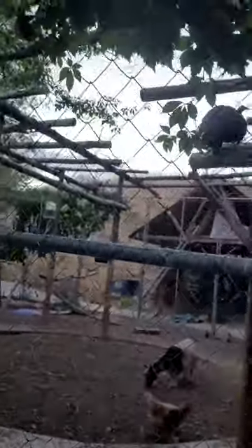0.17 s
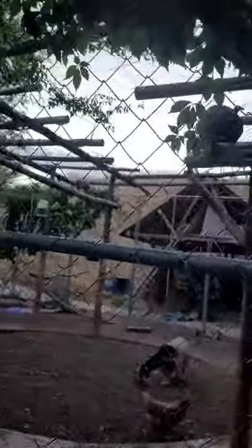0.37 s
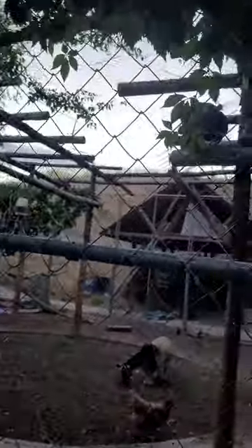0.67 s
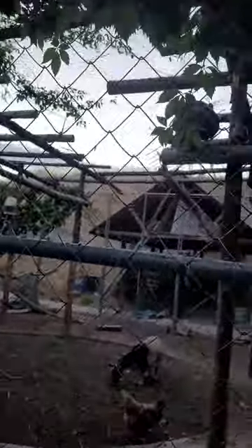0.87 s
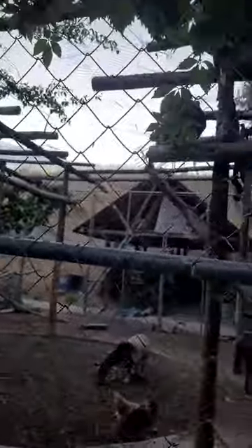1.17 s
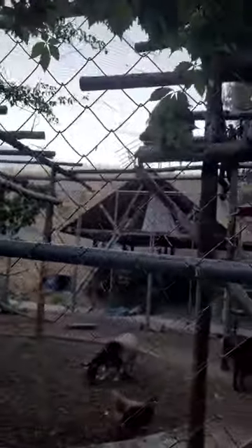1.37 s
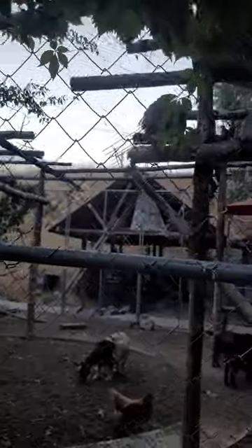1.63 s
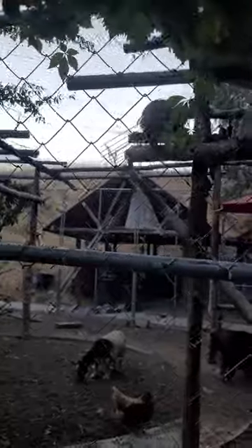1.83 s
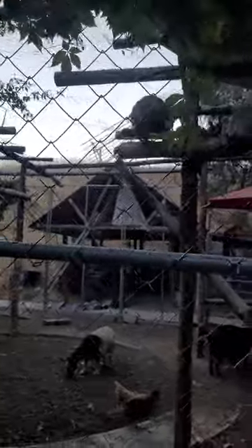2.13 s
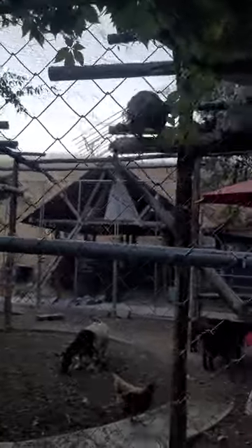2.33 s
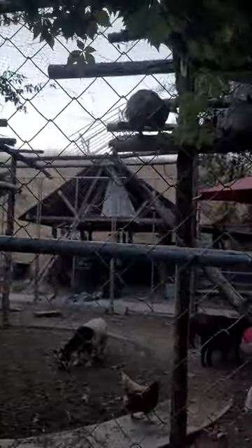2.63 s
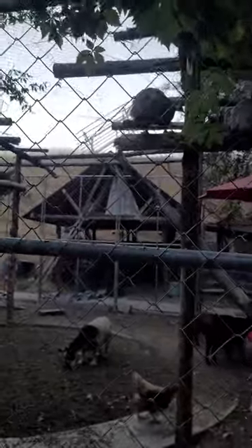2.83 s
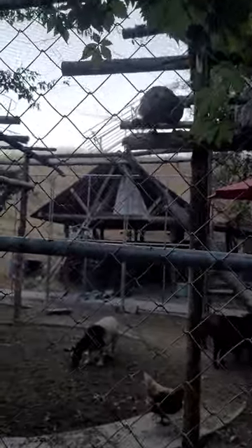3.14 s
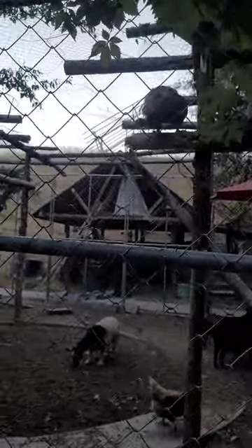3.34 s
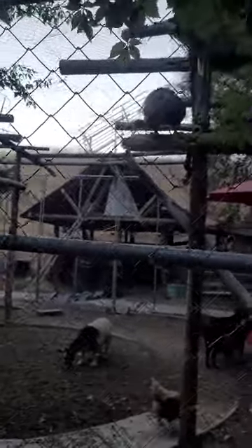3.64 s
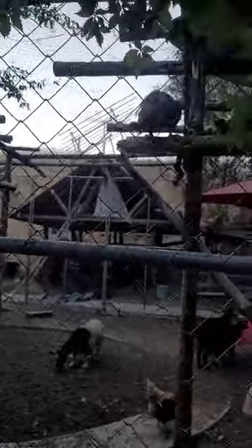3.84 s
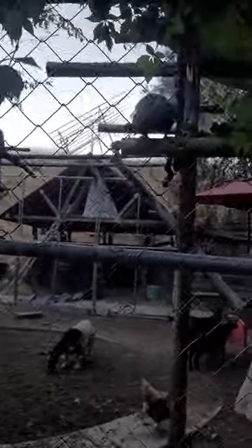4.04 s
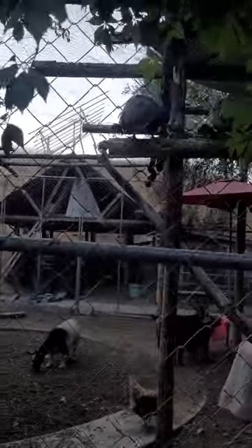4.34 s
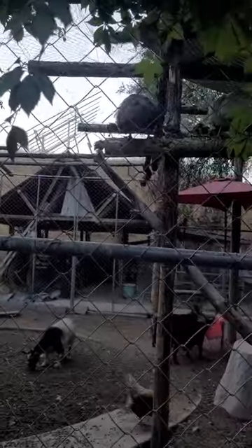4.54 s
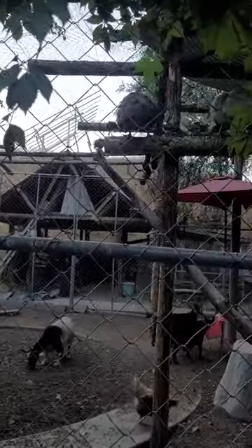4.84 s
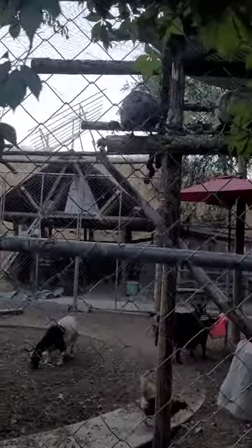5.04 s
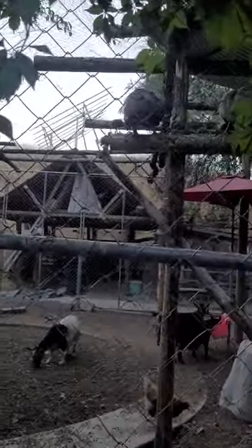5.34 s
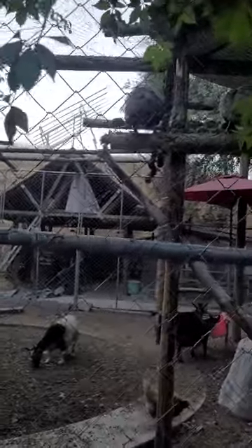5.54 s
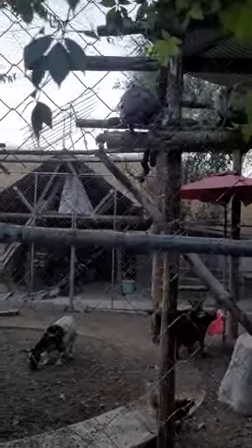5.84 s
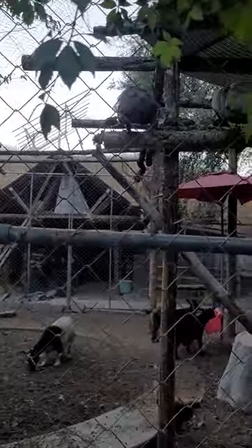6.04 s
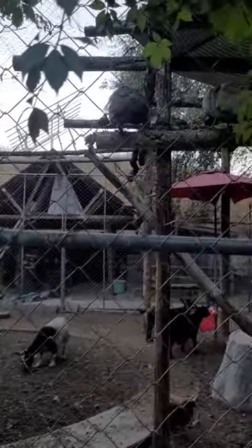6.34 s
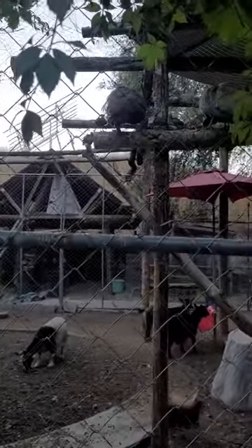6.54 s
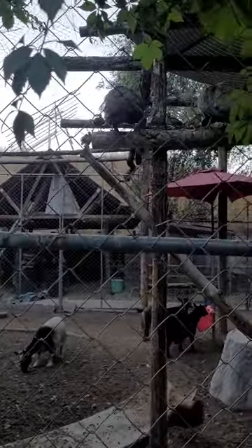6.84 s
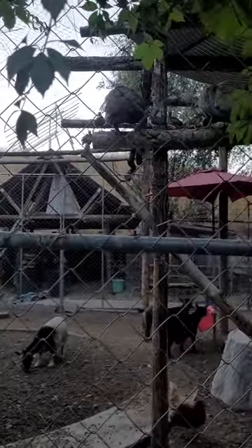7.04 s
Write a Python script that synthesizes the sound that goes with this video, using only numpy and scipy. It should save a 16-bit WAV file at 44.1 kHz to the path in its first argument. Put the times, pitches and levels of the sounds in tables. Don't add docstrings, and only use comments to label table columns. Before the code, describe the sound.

Outdoor animal yard with sheds. Low distant traffic rumble and engine hum run throughout. Many young birds trade quick, thin, falling peeps without pause, while feet softly scuff and snap grit. A dull low knock comes at about one second, then one large bird gives a single short, rough, loud honk. Peeping continues, with a small sharper knock near the end. Stereo handheld microphone, short yard echo.

```python
import sys
import numpy as np
from scipy import signal
from scipy.fft import rfft, irfft
from scipy.io import wavfile
from scipy.ndimage import uniform_filter1d

SR = 44100
rng = np.random.default_rng(int(sys.argv[2]) if len(sys.argv) > 2 else 0)


def gain_from_db(level_db):
    decades = np.asarray(level_db, float) / 20
    return 10 ** decades


def put_to_file(sound):
    columns = np.atleast_2d(sound).T
    safe = np.clip(columns, -1, 1)
    whole_steps = np.round(safe * 32767)
    wavfile.write(sys.argv[1], SR, whole_steps.astype(np.int16))


N = 317520

# t/s, rumble level/dB, roar level/dB, hiss level/dB
TRAFFIC = [
    (0.0, -46, -50.5, -77.5),
    (0.18, -44.5, -52, -82.5),
    (2.38, -52.5, -53, -84),
    (3.15, -47.5, -53, -81),
    (5.21, -51, -54, -84),
    (5.52, -48.5, -53.5, -82.5),
    (7.2, -53, -56, -86),
]
# f/Hz, level/dB per Hz
FAR_COLOUR = [(15, -34.5), (25, -8), (53, -2), (71, 1), (173, -9), (262, -10), (414, -14.5), (578, -14.5),
              (682, -12.5), (857, -12), (1470, -18), (1970, -22.5), (2380, -27), (3110, -37), (3600, -55),
              (4680, -77), (7920, -120)]
# f/Hz, level/dB per Hz
HISS_COLOUR = [(1940, -28), (3300, -0.5), (3520, -8), (5860, -10.5), (6680, -4.5), (7320, -10.5),
               (8240, -13.5), (14900, -15.5), (15700, -21)]
# f/Hz, width/Hz, level/dB, fade in t/s, fade out t/s
ENGINES = [
    (55.5, 6.5, -53.5, 1, 5.8),
    (117.9, 4.9, -54, -0.5, 1.39),
    (84.2, 4.8, -54.5, 4, 6.3),
    (235.6, 3.6, -62, -1.5, 4.3),
    (252, 6.2, -63, 0, 6),
    (122.5, 3.4, -57, 2.9, 4.2),
]
# f/Hz, left-right likeness/0-1
LIKENESS = [(60, 0.94), (300, .96), (700, 0.66), (1500, 0.28), (3000, 0.1), (6000, 0.06)]
YARD_T60_S = 0.26
# t/s, peak level/dB, t60/s, brightness/dB, rise/s
SCUFFS = [(0.0922, -68, 0.3, -16, 0.011), (0.4733, -65, 0.41, -9, 0.02), (0.5294, -70.5, 0.3, -5, 0.013),
          (0.9906, -67, 0.25, -14, 0.01), (1.314, -56.5, 0.18, -6.5, 0.0071),
          (2.3176, -72, 0.3, -18, 0.015), (2.5521, -64, 0.34, -11.5, 0.013),
          (2.804, -65, 0.23, -19.5, 0.011), (3.0694, -68, 0.3, -12, 0.015),
          (3.1173, -63.5, 0.37, -27, 0.015), (3.2594, -77, 0.54, 0, 0.017), (3.3278, -69, 0.37, -6, 0.015),
          (3.3822, -64, 0.36, -14, 0.016), (3.4594, -71, 0.33, -7, 0.014), (3.6318, -76, 0.3, -7, 0.014),
          (4.2717, -61, 0.32, -15, 0.015), (4.2931, -64.5, 0.27, -3, 0.012), (4.3226, -64, 0.44, -8, 0.015),
          (4.4383, -61, 0.27, -12.5, 0.012), (4.5296, -76.5, 0.3, -26, 0.015),
          (4.7237, -64.5, 0.38, -18, 0.018), (4.779, -60.5, 0.17, -23, 0.01),
          (5.2385, -71, 0.3, -11, 0.015), (5.4321, -59, 0.22, -4.5, 0.019), (5.4544, -72, 0.27, -12, 0.015),
          (5.8835, -71, 0.3, -6, 0.013), (6.0294, -76.5, 0.3, -3, 0.015), (6.5394, -79, 0.3, -4, 0.015)]
# f/Hz, level/dB per Hz
GRIT_COLOUR = [(1940, -34), (3300, -2.5), (4210, -2.5), (5110, -12), (7430, -8.5), (8000, -20),
               (10400, -39), (17600, -120)]
# t/s, peak level/dB, ring f/Hz
SNAPS = [(0.5945, -61, 7290), (0.7148, -58, 9870), (0.857, -70, 6490), (3.5987, -60, 4500),
         (4.2936, -52, 4370), (4.3226, -46, 4170), (4.4383, -54, 4140), (5.3238, -67, 9840),
         (5.675, -64, 6540), (6.0132, -64, 7330), (6.1245, -67, 4680), (6.325, -68, 7160)]
# t/s, peak level/dB, f/Hz, t60/s
THUDS = [
    (1.065, -36, 310, 0.084),
    (5.449, -37, 1200, 0.023),
]
# t/s, f/Hz, level/dB
PEEPS = [
    [(0.15, 2420, -62), (0.238, 2337, -56), (0.26, 1830.0, -60)],
    [(0.2, 2740.0, -73), (0.278, 2530, -67), (0.3, 2400.0, -62)],
    [(0.3, 2495, -71), (0.42, 2504, -59), (0.45, 2020.0, -63)],
    [(0.49, 2840, -75), (0.576, 2645, -59), (0.61, 2460, -64)],
    [(0.51, 2440, -60), (0.602, 2280.0, -56), (0.63, 1820.0, -60)],
    [(0.72, 2300.0, -67.5), (0.77, 2376, -50.5), (0.8, 2010.0, -72)],
    [(0.78, 2510, -66.5), (0.854, 2420, -65.5), (0.88, 2110.0, -61)],
    [(0.78, 2980.0, -71), (0.888, 2496, -56.5), (0.93, 1700, -63)],
    [(1.05, 2520, -58.5), (1.134, 2360, -54.5), (1.15, 1980, -59)],
    [(0.98, 2740, -78), (1.1, 2810, -64.5), (1.15, 2770, -58)],
    [(1.15, 2756, -71.5), (1.208, 2707, -52), (1.25, 1700, -57)],
    [(1.27, 2580, -65), (1.318, 2590, -63), (1.36, 2335, -58)],
    [(1.28, 2450.0, -58.5), (1.354, 2355, -54.5), (1.39, 2060, -68)],
    [(1.7, 2580.0, -65), (1.746, 2380.0, -55.5), (1.81, 2400.0, -50)],
    [(1.78, 2753, -72), (1.878, 2690, -59.5), (1.92, 1720.0, -59)],
    [(1.96, 2362, -59.5), (2.042, 2390.0, -55.5), (2.06, 2160.0, -66)],
    [(1.95, 2980.0, -74), (2.036, 2700, -70), (2.08, 2350, -72)],
    [(2.08, 2720.0, -75), (2.124, 2900, -74.5), (2.17, 2660, -68)],
    [(2.16, 2730, -64), (2.214, 2614, -60), (2.27, 1510, -59)],
    [(2.23, 2420, -71), (2.29, 2380, -67), (2.32, 2020, -57)],
    [(2.37, 2440, -63), (2.454, 2520, -57), (2.48, 2260, -56)],
    [(2.44, 2930.0, -74), (2.548, 2480, -58), (2.58, 1810.0, -52)],
    [(2.52, 2900, -68), (2.566, 2820, -67), (2.61, 2720.0, -73.5)],
    [(2.61, 2737, -73), (2.748, 2380.0, -55.5), (2.77, 1920, -53.5)],
    [(2.95, 2553, -69), (3.012, 2476, -55.5), (3.04, 2250, -54)],
    [(2.95, 2986, -68), (3.128, 2480, -55), (3.17, 1910, -44.5)],
    [(3.05, 2450, -59), (3.068, 2360.0, -66), (3.11, 2520.0, -60)],
    [(3.03, 2800, -71), (3.14, 2894, -63), (3.21, 2360, -64)],
    [(3.13, 2050.0, -49), (3.158, 2140, -55), (3.24, 1934, -57)],
    [(3.32, 3140, -74), (3.37, 2790, -59), (3.39, 2580, -73)],
    [(3.39, 2550.0, -52), (3.416, 2480, -54.5), (3.45, 1900.0, -45)],
    [(3.41, 3100, -62), (3.548, 2645, -59.5), (3.6, 2110, -57)],
    [(3.59, 2050.0, -64), (3.628, 1780.0, -59), (3.69, 1800, -64)],
    [(3.62, 3020.0, -72), (3.718, 2580.0, -57), (3.77, 1627, -55)],
    [(3.77, 1910.0, -69), (3.838, 2030, -65), (3.92, 2030, -70)],
    [(3.91, 3010, -70), (4.038, 2570, -54), (4.08, 1690, -52)],
    [(4.04, 2780, -66), (4.134, 2850, -66.5), (4.19, 2410.0, -62)],
    [(4.14, 2620.0, -69), (4.178, 2210, -62), (4.25, 2090, -54.5)],
    [(4.26, 2900.0, -78), (4.372, 2673, -56.5), (4.42, 1750.0, -58)],
    [(4.28, 2530.0, -76), (4.326, 2390, -68), (4.38, 2410, -52.5)],
    [(4.46, 2780.0, -69), (4.664, 2690.0, -64), (4.7, 2270, -54.5)],
    [(4.52, 2470, -66.5), (4.592, 2360, -55), (4.62, 1970.0, -66)],
    [(4.61, 2570.0, -67), (4.648, 2460.0, -69), (4.7, 2280.0, -53)],
    [(4.82, 2320, -66), (4.952, 2450, -60.5), (5.02, 2080.0, -66)],
    [(5.0, 2400.0, -66), (5.054, 2337, -64), (5.12, 2290, -62)],
    [(4.97, 2870, -71), (5.046, 2880, -69), (5.14, 2640, -65)],
    [(5.14, 2410.0, -64), (5.2, 2384, -61), (5.23, 2100, -58)],
    [(5.2, 2720.0, -67), (5.242, 2630, -66), (5.27, 2490.0, -63)],
    [(5.25, 2330, -67), (5.3, 2416, -53), (5.33, 2100, -63)],
    [(5.31, 2410.0, -67), (5.362, 2470, -67), (5.39, 2240, -64)],
    [(5.37, 2840, -72), (5.534, 2850, -60.5), (5.58, 1694, -54.5)],
    [(5.48, 2378, -59), (5.534, 2400.0, -58), (5.56, 2390, -56)],
    [(5.57, 2496, -72), (5.628, 2535, -62), (5.65, 2210.0, -53)],
    [(5.85, 2820, -71), (5.91, 2830, -70), (5.96, 2580.0, -65)],
    [(5.88, 2490, -67), (5.952, 2370, -63), (5.99, 2230, -66)],
    [(5.99, 2474, -68), (6.044, 2470.0, -58), (6.07, 2060, -58)],
    [(6.13, 2400.0, -68), (6.182, 2410.0, -59), (6.22, 2240, -63)],
    [(6.22, 2430.0, -64), (6.272, 2386, -59), (6.3, 2150, -61)],
    [(6.28, 2654, -82), (6.492, 2807, -66.5), (6.57, 2510, -63)],
    [(6.45, 2474, -71), (6.52, 2407, -56.5), (6.55, 2070, -65)],
    [(6.6, 2430, -65), (6.63, 2460, -66), (6.67, 2400, -64)],
    [(6.69, 2540, -67), (6.768, 2440, -59), (6.79, 2070, -57)],
    [(6.79, 2520.0, -72), (6.834, 2510.0, -57.5), (6.87, 2000, -58)],
    [(6.89, 2474, -65), (6.954, 2273, -58.5), (6.98, 2160, -55)],
    [(6.99, 2314, -61), (7.062, 2500.0, -63.5), (7.09, 2300, -56)],
    [(7.01, 2210.0, -64), (7.068, 2050.0, -57), (7.1, 2040, -67)],
    [(7.03, 2910, -69), (7.112, 2770, -64), (7.17, 2290, -73)],
]
# t/s, low membrane f/Hz, its level/dB, high membrane f/Hz, its level/dB,
# overtone level/dB, rasp level/dB
HONK = [(1.442, 401, -49, 1108, -65, -59.5, -70), (1.455, 418.7, -36, 1116, -51, -49, -74),
        (1.475, 437, -33.5, 1133, -43.5, -40, -53), (1.487, 438.1, -33.5, 1153, -37, -46, -43),
        (1.505, 443.6, -41, 1150, -36.5, -41, -47), (1.52, 447.5, -38, 1163, -35, -42, -43.5),
        (1.54, 467.8, -36.5, 1167, -41, -38.5, -43.5), (1.56, 474.4, -35.5, 1144, -42, -37.5, -41.5),
        (1.585, 473.5, -33, 1142, -48, -40.5, -43), (1.605, 463, -33, 1160, -42, -40, -43.5),
        (1.62, 453, -32.5, 1140, -49, -42, -49), (1.635, 447, -52, 1140, -60, -57, -56)]
# t/s, f/Hz, level/dB, unsteadiness/0-1
BREAK = [
    (1.51, 770.3, -65, .05),
    (1.525, 763.4, -41.5, 0.05),
    (1.54, 753, -37, .05),
    (1.56, 740.3, -40, 0),
    (1.585, 737.3, -39.5, 0.01),
    (1.6, 737, -45, 0.02),
    (1.62, 740, -56, 0.01),
]
# multiple, level/dB
OVERTONES = [(2, -2), (3, -5.5), (4, -9.5), (5, -14.5)]
# multiple of low, multiple of third, level/dB
COUPLED = [(0, 1.008, -1.5), (1, 1, -1), (-1, 2, -3), (2, 1, -2), (0, 2, -3), (3.5, 1, -12), (1.5, 2, -6.5),
           (1, 3, -7), (2.5, 2, -5), (3, 2, -12), (4.5, 2, -13)]
# t/s, level/dB
HALF_LINES = [
    (1.47, -58),
    (1.495, -40.5),
    (1.515, -43.5),
    (1.535, -68),
]
# f/Hz, level/dB per Hz
THROAT_COLOUR = [(290, -38), (500, -4), (552, -10), (949, -6), (1060, -10), (1170, -1), (1280, -5.5),
                 (4290, -24.5), (7060, -42.5), (7910, -56), (15000, -63.5)]


def in_time(rows):
    s, *columns = np.transpose(rows)
    return [np.interp(np.arange(N) / SR, s, column) for column in columns]


def rms_one(x):
    return x / np.sqrt(np.mean(x ** 2) + 1e-20)


def at_hz(points, hz):
    table_hz, value = np.array(points)[:, 0], np.array(points)[:, 1]
    return np.interp(np.log(hz + 1), np.log(table_hz), value)


def colour(x, spectrum, low_hz, high_hz):
    hz = np.fft.rfftfreq(x.shape[-1], 1 / SR)
    low_cut = 1 + (low_hz / (hz + 1)) ** 12
    high_cut = 1 + (hz / high_hz) ** 12
    gain = gain_from_db(at_hz(spectrum, hz)) / np.sqrt(low_cut * high_cut)
    return rms_one(irfft(rfft(x) * gain, x.shape[-1]))


def wide_noise():
    mid, side = rfft(rng.standard_normal((2, N)))
    alike = np.clip(at_hz(LIKENESS, np.fft.rfftfreq(N, 1 / SR)), 0, 1)
    return irfft(np.sqrt(1 + alike) * mid + np.sqrt(1 - alike) * side * [[1], [-1]], N)


def drift(rate_hz):
    knot_rate = 2000
    knots = rng.standard_normal(int(N / SR * knot_rate))
    r = np.exp(-2 * np.pi * rate_hz / knot_rate)
    slow = rms_one(signal.lfilter([1], [1, -2 * r, r * r], knots))
    return np.interp(np.arange(N) * knot_rate / SR, np.arange(len(slow)), slow)


def turning(hz):
    return 2 * np.pi * np.cumsum(hz) / SR


def resonance(x, hz, width_hz):
    r = np.exp(-np.pi * width_hz / SR)
    zeros = [(1 - r * r) / 2, 0, (r * r - 1) / 2]
    poles = [1, -2 * r * np.cos(2 * np.pi * hz / SR), r * r]
    return signal.lfilter(zeros, poles, x)


def place(x, pan_db, left_leads_s):
    left, right = np.broadcast_to(x, (2, N))
    t = np.arange(N)
    late_right = np.interp(t - left_leads_s * SR, t, right)
    return np.array([gain_from_db(pan_db / 2) * left, gain_from_db(-pan_db / 2) * late_right])


def traffic():
    rumble_db, roar_db, hiss_db = in_time(TRAFFIC)
    rumble = gain_from_db(rumble_db - 1.0 + 1.14 * drift(4.9)) * colour(wide_noise(), FAR_COLOUR, low_hz=41.6, high_hz=198)
    out = place(rumble, pan_db=-1.0, left_leads_s=0.00015)
    out += gain_from_db(roar_db + 3 + 0.6 * drift(7.8)) * colour(wide_noise(), FAR_COLOUR, low_hz=198, high_hz=3820)
    out += gain_from_db(hiss_db + 2.5 + 0.6 * drift(5)) * colour(wide_noise(), HISS_COLOUR, low_hz=3570, high_hz=17000)
    t = np.arange(N) / SR
    for hz, width_hz, level_db, comes, goes in ENGINES:
        once = resonance(rng.standard_normal(N), hz, width_hz)
        hum = rms_one(resonance(once, hz, width_hz))
        hum *= gain_from_db(level_db) * np.clip(np.minimum(t - comes, goes - t) / 0.4 + 0.5, 0, 1)
        out += place(hum, pan_db=-1.0, left_leads_s=0.00025)
    return out


def yard(x, level_db):
    t = np.arange(SR // 2) / SR
    first_echo_s = 0.006
    tail = rng.standard_normal((2, len(t))) * gain_from_db(-60 * t / YARD_T60_S) * (t > first_echo_s)
    tail = signal.lfilter([1], [1, -0.5], tail)
    tail = tail / np.sqrt(np.sum(tail ** 2, axis=1, keepdims=True))
    return gain_from_db(level_db) * signal.fftconvolve(x[None], tail, axes=1)[:, :N]


def scuffs(grains_per_s=9000):
    hits = rng.random((2, N)) < grains_per_s / SR
    grains = hits * rng.standard_normal((2, N)) * gain_from_db(1.5 * rng.exponential(1, (2, N)))
    grains = grains + 0.5 * grains[::-1]
    body = colour(grains, GRIT_COLOUR, low_hz=1800, high_hz=7460)
    top = colour(grains, HISS_COLOUR, low_hz=8300, high_hz=17000)
    t, dull, bright = np.arange(N) / SR, 0, 0
    for s, peak_db, t60, bright_db, rise in SCUFFS:
        since = t - s
        attack = np.clip(since / max(rise, 0.002), 0, 1)
        shape = attack * gain_from_db(peak_db - 3 - 60 * np.maximum(since - rise, 0) / max(t60, 0.03))
        dull = dull + shape
        bright = bright + shape * gain_from_db(bright_db)
    lumps = gain_from_db(2.5 * drift(76))
    return lumps * (dull * body + bright * top)


def snaps():
    out = np.zeros(N)
    for s, peak_db, hz in SNAPS:
        click = np.zeros(SR // 50)
        click[0] = gain_from_db(peak_db + 11)
        ring = 3.7 * resonance(click, hz, width_hz=1700)
        crack = 0.32 * np.diff(click, prepend=0)
        at = int(s * SR)
        out[at:at + len(click)] += ring + crack
    return out


def thuds():
    out, t = np.zeros(N), np.arange(N) / SR
    for s, peak_db, hz, t60 in THUDS:
        since = np.maximum(t - s, 0)
        attack = np.minimum(since / (0.095 * t60), 1)
        out += gain_from_db(peak_db - 60 * since / t60) * attack * np.sin(2 * np.pi * hz * since)
    return out


def peeps(edge_s=0.014, octave_db=-29, round_s=0.012):
    tone, octave = np.zeros((2, N))
    waver, shake, throat = drift(34.8), drift(65), drift(9.3)
    chances = rng.random((len(PEEPS), 2)) * [N // 2, 8]
    for rows, (skip, bird_db) in zip(PEEPS, chances):
        s, hz, level_db = np.transpose(rows)
        at = np.arange(int((s[0] - edge_s / 2) * SR), int((s[-1] + edge_s / 2) * SR))
        t = at / SR
        own = (at + int(skip)) % len(waver)
        pitch = uniform_filter1d(np.interp(t, s, hz), max(int(round_s * SR), 1), mode="nearest")
        phase = turning(pitch * (1 + 0.011 * waver[own]))
        edges = np.clip(np.minimum(t - t[0], t[-1] - t) / edge_s, 0, 1)
        shape = edges * gain_from_db(np.interp(t, s, level_db) + 2.77 * shake[own])
        tone[at] += np.sqrt(2) * shape * np.sin(phase)
        octave[at] += shape * gain_from_db(octave_db + bird_db + 3.4 * throat[own]) * np.sin(2 * phase)
    return tone, resonance(octave, hz=5000, width_hz=2500)


def honk(flutter_db=2.5, gate=0.81):
    low_hz, low_db, high_hz, high_db, over_db, rasp_db = in_time(HONK)
    third_hz, third_db, unsteady = in_time(BREAK)
    half_db, = in_time(HALF_LINES)
    low = turning(low_hz * (1 + 0.0041 * drift(60)))
    high = turning(high_hz * (1 + 0.00804 * drift(61)))
    third = turning(third_hz * (1 + unsteady * drift(79.9)))
    tones = [(high, high_db), (high / 2, half_db), (2 * high - low, half_db - 4), (high + low, half_db - 4)]
    tones += [(m * low, over_db + level_db) for m, level_db in OVERTONES]
    tones += [(m * low + n * third, third_db + level_db) for m, n, level_db in COUPLED]
    out = gain_from_db(low_db) * np.sin(low)
    for phase, level_db in tones:
        out += gain_from_db(level_db + flutter_db * drift(30)) * np.sin(phase + rng.uniform(0, 2 * np.pi))
    air = rng.standard_normal(N) * (1 + gate * np.sin(low)) * (1 + gate * np.sin(third))
    rasp = colour(air, THROAT_COLOUR, low_hz=600, high_hz=15000) * gain_from_db(rasp_db + 6.5)
    t = np.arange(N) / SR
    open_beak = np.clip(np.minimum(t - HONK[0][0], HONK[-1][0] - t) / 0.0058, 0, 1)
    return (np.sqrt(2) * out + rasp) * open_beak


def scene():
    call = honk()
    flock, octave = peeps()
    knocks = snaps() + thuds()
    birds = place(call, pan_db=-0.5, left_leads_s=2e-5)
    birds += place(flock, pan_db=-8.5, left_leads_s=0.00013)
    birds += place(octave, pan_db=2.5, left_leads_s=0.00014)
    echoes = yard(call, level_db=-10.5) + yard(flock + octave, level_db=-7)
    feet = place(scuffs() + knocks, pan_db=-1.5, left_leads_s=1.2e-4)
    return birds + echoes + feet + traffic()


def top_cut(x):
    return signal.sosfilt(signal.butter(12, 15880, fs=SR, output="sos"), x)


def record(dry):
    fade = np.clip((N - np.arange(N)) / (0.0077 * SR), 0, 1)
    return top_cut(dry * fade)


dry = scene()
out = record(dry)
put_to_file(out)
```